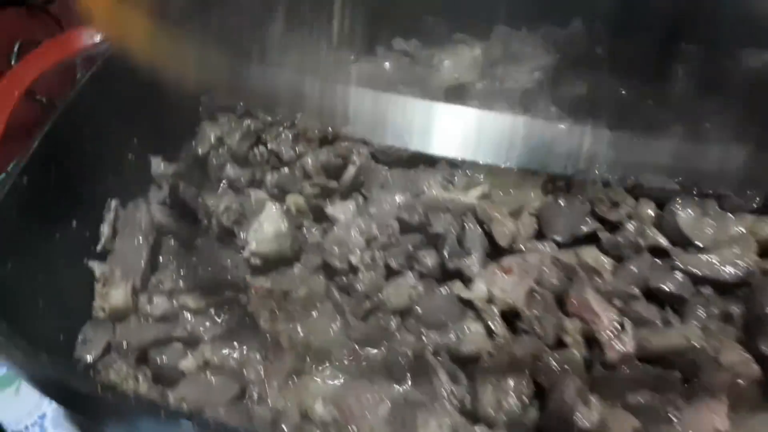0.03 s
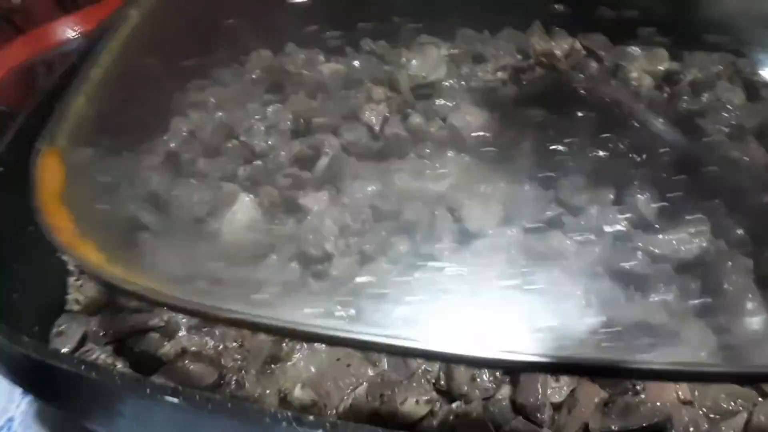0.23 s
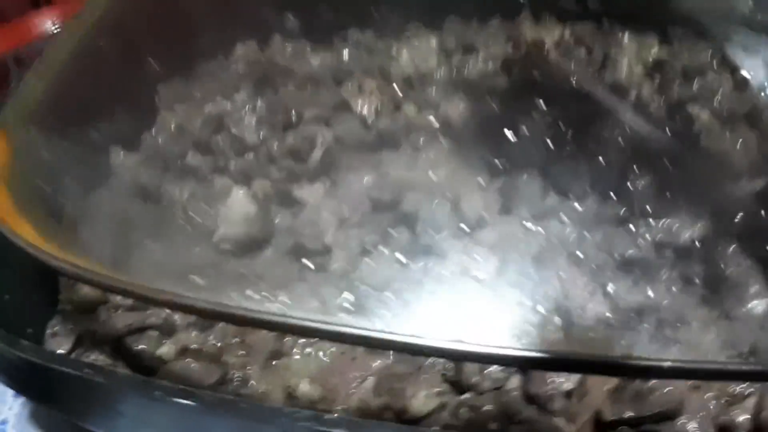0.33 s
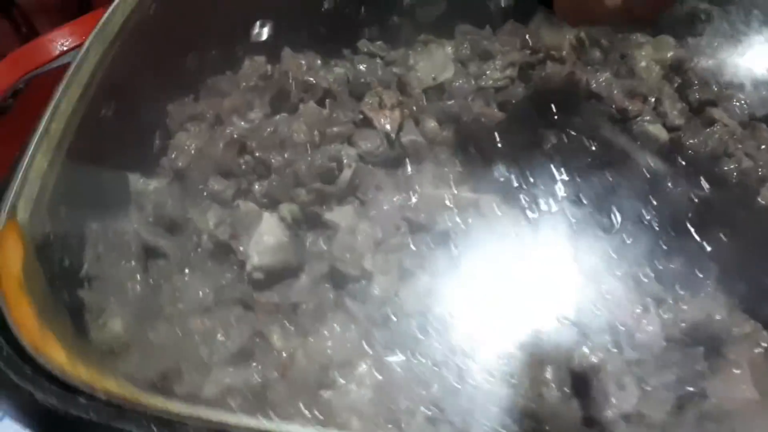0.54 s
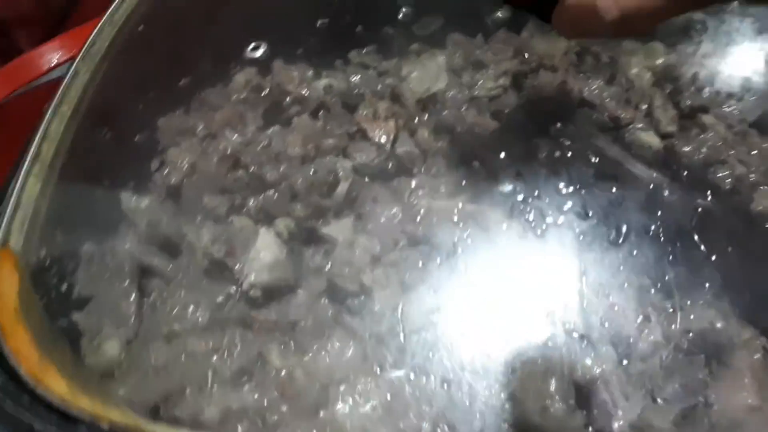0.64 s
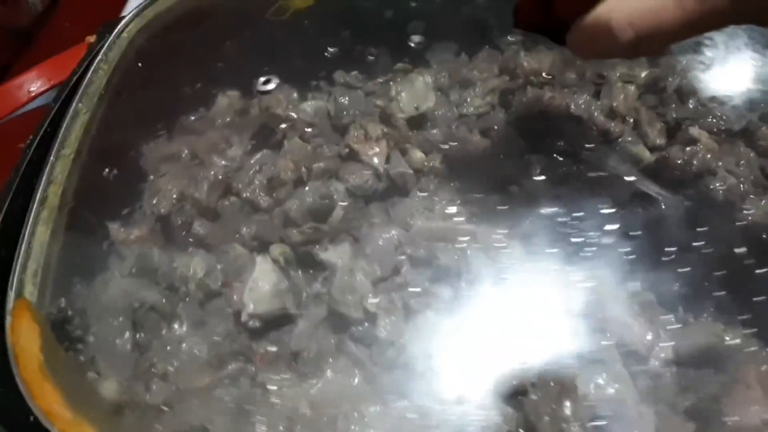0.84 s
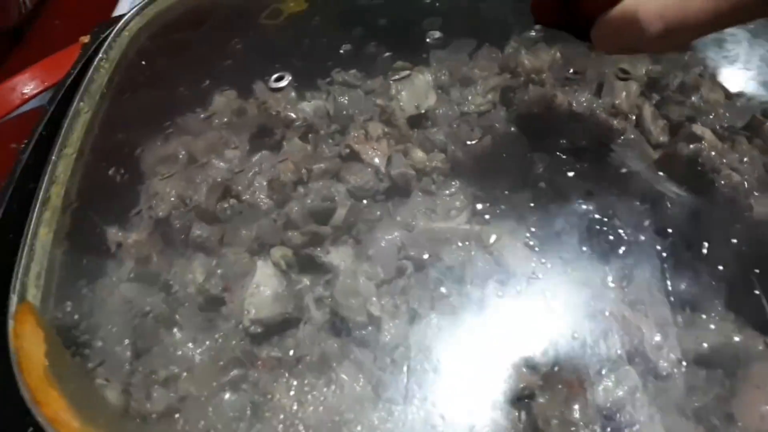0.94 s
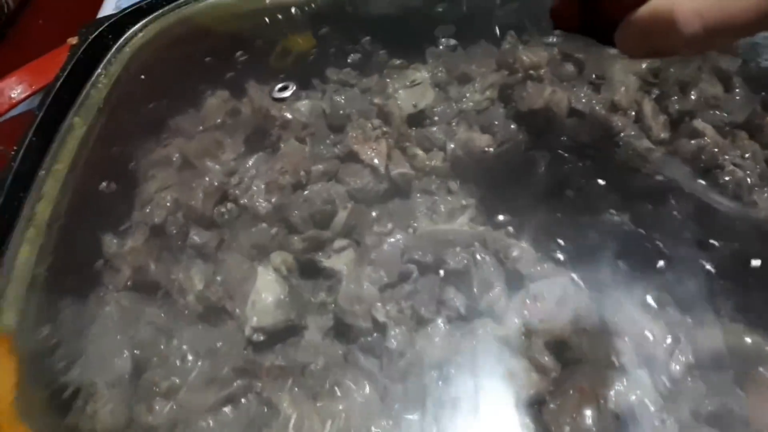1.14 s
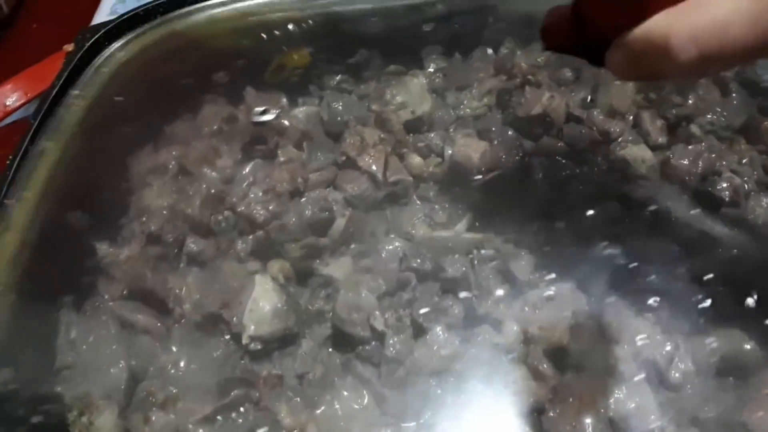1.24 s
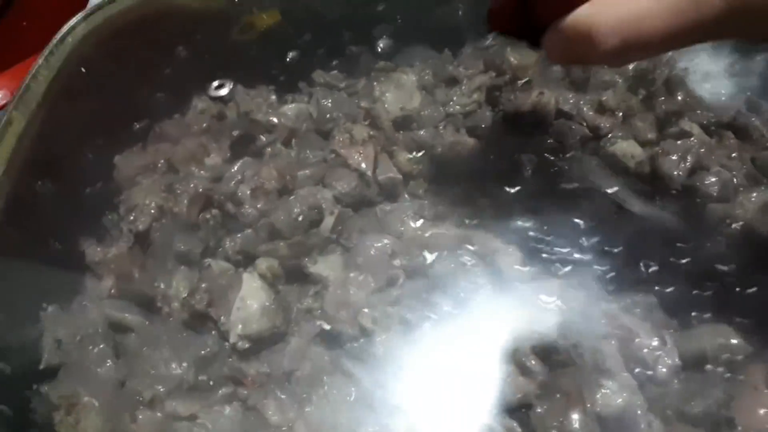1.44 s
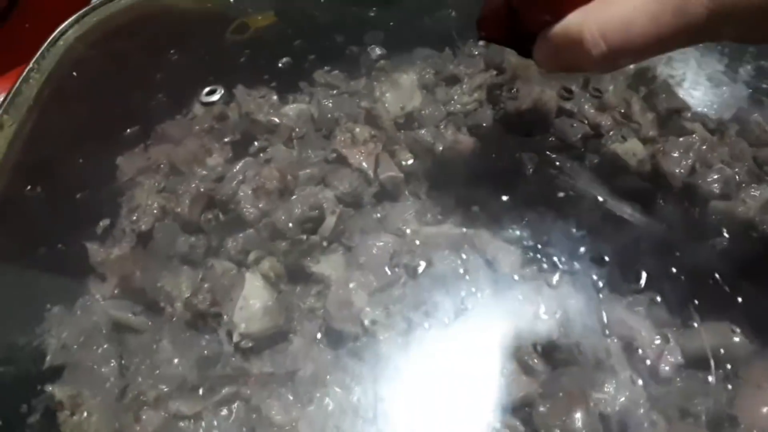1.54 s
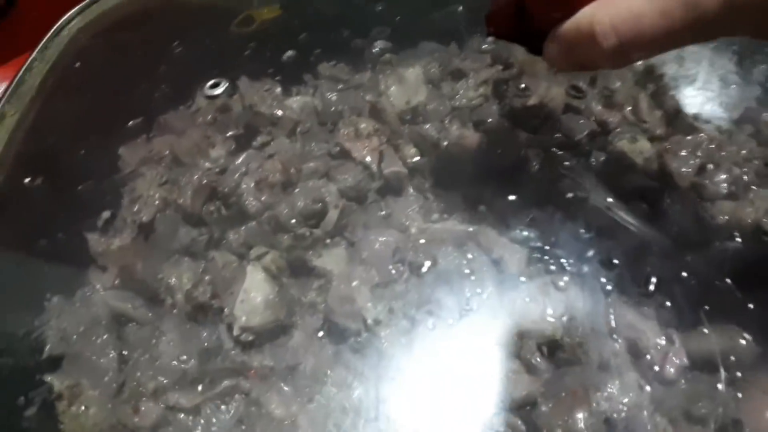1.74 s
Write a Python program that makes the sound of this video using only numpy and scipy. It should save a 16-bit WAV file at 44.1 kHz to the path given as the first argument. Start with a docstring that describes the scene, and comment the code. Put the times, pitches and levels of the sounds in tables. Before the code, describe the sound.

A glass lid clatters, scrapes and thuds onto a pan of faintly sizzling food.

```python
"""Glass lid on a frying pan

A steel-rimmed glass lid is put on a pan of frying food, close by in a small kitchen.
It lands with a clatter, is nudged and scraped along the rim, and drops into place with deepening thuds.
Every knock thumps the pan and rings the lid. The faint sizzle gets quieter as the lid closes."""
import sys
import numpy as np
from scipy import signal
from scipy.fft import rfft, irfft, next_fast_len
from scipy.io import wavfile

SR = 44100
rng = np.random.default_rng(int(sys.argv[2]) if len(sys.argv) > 2 else 0)


def file_out(sig):
    """Save sig as 16-bit WAV at sys.argv[1]."""
    # one column per channel
    cols = np.atleast_2d(sig).T
    # limit, then scale
    lim = np.clip(cols, -1, 1)
    pcm = np.round(lim * 32767).astype(np.int16)
    wavfile.write(sys.argv[1], SR, pcm)


N = 79380
TIME_S = np.arange(N) / SR

# Levels in all tables are relative. A decay is the time a sound takes to fall by 60 dB.
# Each knock of the lid on the pan:
# start_s, thump_pitch_hz, thump_db, thump_rise_s, thump_decay_s, clack_db, crack_db, tick_db
KNOCK_EVENTS = [ (0.2186, 373.5, -7, 0.00046, .035, -16.5, -22.5, -28.5),
                (.249, 411, -7.5, 0.00041, 0.043, -15.5, -28, -29.5),
                (0.2601, 383, -7, 0.00083, 0.026, -17, -26.5, -34),
                (0.2742, 346, -3.5, 0.0008, 0.018, -16, -27.5, -32.5),
                (.2915, 305, -14.5, 0.0011, 0.082, -13, -33, -38),
                (.306, 315.5, -8.5, 0.00074, 0.067, -16, -26.5, -32.5),
                (.329, 326.4, -10.5, 0.0031, 0.07, -42, -38, -58),
                (0.397, 308, -7, 0.0028, 0.057, -21.5, -32.5, -43),
                (0.4151, 298.4, -11.5, 0.00033, .045, -51, -44, -68),
                (.460, 208, -26.5, .001, 0.081, -40, -46.5, -58),
                (.474, 333, -11, 0.011, 0.057, -34, -67, -64),
                (.506, 202.5, -29.5, 0.0051, 0.11, -47, -59, -66),
                (0.559, 281, -14, 0.00062, 0.044, -26.5, -42, -51),
                (.577, 224, -9.5, 0.001, 0.062, -29, -36.5, -48.5),
                (0.5825, 232, -42, 0.0012, 0.025, -24, -42.5, -50),
                (.600, 284, -23.5, 0.0051, .07, -54, -48, -59),
                (0.618, 317, -28.5, 0.0062, 0.1, -63, -67, -75),
                (.727, 247, -12, 0.0084, 0.036, -47, -75, -76),
                (.8582, 274, -2.5, 0.0026, 0.03, -27.5, -56.5, -74),
                (0.8738, 268, -12.5, 0.0016, 0.026, -35, -49, -58),
                (.912, 253, -18, 0.0029, 0.04, -40, -54, -63),
                (.938, 296, -23, 0.0011, 0.043, -50, -61, -70),
                (1.067, 306, -21, .0015, 0.12, -37.5, -56, -58),
                (1.0793, 213, -13, 0.0016, 0.051, -28, -41, -55.5),
                (1.1083, 335, -19.5, 0.00094, 0.067, -38, -52, -66),
                (1.192, 353, -14.5, 0.00081, 0.036, -25.5, -41.5, -62),
                (1.211, 361, -24, .002, 0.066, -24, -67, -60),
                (1.2455, 342.3, -3, 0.0011, 0.061, -18.5, -32, -36.5),
                (1.2796, 319, -10, 0.0011, 0.069, -17.5, -32.5, -37),
                (1.385, 270, -0.5, 0.0021, 0.02, -26.5, -42, -54),
                (1.405, 257, -9, 0.0021, 0.044, -34, -56, -75),
                (1.456, 193, -4.5, 0.0013, 0.016, -15, -28.5, -51),
                (1.464, 221, -7.5, 0.0011, 0.051, -20, -37, -41),
                (1.481, 256, -9, 0.00048, 0.052, -28.5, -35, -45.5),
                (1.509, 197.6, -6, 0.00041, 0.017, -39, -45, -47),
                (1.520, 134.7, -11.5, 0.00067, 0.093, -50, -59, -67),
                (1.5265, 200, -12.5, 0.00088, 0.025, -26, -79, -71),
                (1.536, 243, -12, 0.00082, 0.03, -46, -67, -73)]


def amp(db):
    """Turn decibels into a gain."""
    return 10 ** (np.asarray(db) / 20)


def unit(x):
    """Scale a sound to an average (rms) level of 1."""
    return x / np.sqrt(np.mean(x ** 2) + 1e-20)


def along(points, hz):
    """Read between the rows of a (pitch_hz, value) table, on a log pitch scale."""
    pitches, values = np.transpose(points)
    return np.interp(np.log(hz + 1), np.log(pitches + 1), values)


def fade(t, decay_s):
    """Start at t = 0 and die away."""
    return (t >= 0) * np.exp(-np.log(1000) * np.maximum(t, 0) / decay_s)


def struck(t, rise_s, decay_s):
    """Rise smoothly from t = 0, then die away."""
    return fade(t, decay_s) * (1 - np.exp(-(t / rise_s) ** 2))


def filtered(x, response):
    """Multiply each frequency in x by response(hz)."""
    size = next_fast_len(N + SR // 2)
    return irfft(rfft(x, size) * response(np.fft.rfftfreq(size, 1 / SR)), size)[..., :N]


def coloured(pair, tone):
    """Turn two unrelated signals into one stereo sound with the given tone."""
    # How alike left and right are: pitch_hz, likeness (0 to 1)
    likeness = [(100, 1), (350, 0.61), (900, 0.24), (2000, 0), (16000, 0)]

    def response(hz):
        angle = np.arccos(np.clip(along(likeness, hz), -1, 1)) / 2
        return amp(along(tone, hz)) * [np.cos(angle), np.sin(angle)]
    mid, side = filtered(pair, response)
    return unit(np.array([mid + side, mid - side]))


def noise(tone):
    """Smooth stereo noise."""
    return coloured(rng.standard_normal((2, N)), tone)


def clicks(tone, per_s):
    """Tiny clicks at random moments."""
    return coloured((rng.random(N) < per_s / SR) * rng.standard_normal((2, N)), tone)


def kitchen():
    """A low, steady rush with a faint hum."""
    # Tone of the rush: pitch_hz, level_db
    rush_tone = [(20, -48), (45, -34), (62, 2.5), (95, -8), (200, 2), (310, 3), (420, 8), (520, -6.5),
                 (850, -2), (1300, -16), (3000, -39.5), (16000, -63)]
    hum_hz = 418
    return amp(-43.5) * noise(rush_tone) + amp(-50.5) * np.sin(2 * np.pi * hum_hz * TIME_S)


def room_echo(x):
    """The kitchen answers a sound with a short wash of echoes."""
    # How long the room rings: pitch_hz, decay_s
    decays = [(150, 0.37), (400, 0.4264), (1500, 0.54), (5000, 0.23), (14000, 1)]
    # How strongly it answers: pitch_hz, level_db
    echo_tone = [(100, -12), (200, -7.5), (330, -1), (550, 1.5), (1300, -12), (5000, -4), (14000, -19)]
    delay_s = 0.0069
    hz, t, bands = signal.stft(rng.standard_normal((2, SR // 2)), SR, nperseg=256)
    tail = signal.istft(bands * fade(t, along(decays, hz)[:, None]), SR, nperseg=256)[1]
    echo = signal.fftconvolve(x, tail / np.linalg.norm(tail[0]), axes=1)[:, :N]
    return filtered(echo, lambda f: amp(along(echo_tone, f)) * np.exp(-2j * np.pi * f * delay_s))


def sizzle():
    """Hot fat hisses, pops and throws a fine spray, quieter under the lid."""
    # Loudness of the frying and of the spray: time_s, level_db
    frying_levels = [(0, -46), (.3, -44.5), (.7, -49.5), (.95, -47), (1.4, -43.5), (1.8, -54.5)]
    spray_levels = [(0, -49.5), (.5, -58), (.78, -64), (.95, -58), (1.1, -61), (1.35, -60), (1.8, -62)]
    # Their tones: pitch_hz, level_db
    frying_tone = [(200, 8), (800, 7), (1400, 8.5), (2500, 1), (4500, -3), (5600, -11.5), (8300, -14.5),
                   (10000, -24.5), (13000, -12), (16000, -37)]
    spray_tone = [(3000, -11), (6500, 2), (8200, 7), (10000, 0.5), (13000, 0), (16000, 8)]
    loudness = lambda levels: amp(np.interp(TIME_S, *np.transpose(levels)))
    frying = noise(frying_tone) + amp(-10.5) * clicks(frying_tone, per_s=350)
    return loudness(frying_levels) * frying + loudness(spray_levels) * noise(spray_tone)


def pings():
    """Glass and spitting fat give brief, high pings."""
    # Each ping: start_s, pitch_hz, level_db, decay_s
    events = [(0.2203, 5960, -29, 0.011), (0.561, 4470, -48, 0.057), (0.65, 8100, -56, 0.035),
              (1.195, 4840, -39, 0.025), (1.211, 4760, -41, 0.043)]
    width = 0.064  # as a share of the pitch

    def ring(hz):
        hiss = rng.standard_normal((2, N))
        return unit(filtered(hiss, lambda f: 1 / (1 + ((f / hz - 1) / width) ** 4)))
    return sum(amp(db) * fade(TIME_S - start, decay) * ring(hz) for start, hz, db, decay in events)


def rim_scrapes():
    """The rim slides over the pan's edge in many small slips."""
    # Each slide: start_s, rise_s, fall_s, level_db
    slides = [(0.249, 0.041, 0.063, -25), (1.088, 0.057, 0.038, -28.5), (1.256, 0.019, 0.049, -25.5),
              (1.46, 0.018, 0.15, -35)]
    # Tone of the scraping: pitch_hz, level_db
    scrape_tone = [(60, -20), (160, 11), (330, 9), (650, -7.5), (850, 1), (1020, -1.5), (1350, 2),
                   (1580, -4.5), (1800, -1.5), (2200, -9), (4400, -15.5), (5600, -25.5), (8300, -28),
                   (10000, -36), (16000, -35)]
    push = sum(amp(db) * np.interp(TIME_S, [start, start + rise, start + rise + fall], [0, 1, 0])
               for start, rise, fall, db in slides)
    return push * clicks(scrape_tone, per_s=4500)


def rim_clatter():
    """Each knock shakes rim and pan: a clack, a sharp crack, a high tick, then the rim buzzes on."""
    # Tones of the quickly damped shaking, its hard edge and its highest part: pitch_hz, level_db
    clack_tone = [(30, -45), (90, -17.5), (180, 1), (450, 7), (650, -2), (830, -5), (1020, -5),
                  (1320, -3.5), (1650, -9), (2100, -12.5), (2800, -17.5), (4500, -31), (16000, -70)]
    crack_tone = [(300, -39), (1400, 1), (2000, -1), (2400, -2), (2750, 2), (3600, 1), (4600, -2),
                  (5400, -9.5), (8000, -28), (16000, -34)]
    tick_tone = [(2000, -33), (5000, -14), (6200, 1), (8300, 2.5), (9800, -5.5), (12300, -3),
                 (16000, -13.5)]
    starts, *_, clack_db, crack_db, tick_db = np.transpose(KNOCK_EVENTS)

    def strikes(levels_db, rise_s, decay_s):
        power = np.zeros(N)
        for start, db in zip(starts, levels_db):
            age = TIME_S - start
            snap = 1 + amp(-1) * fade(age, decay_s=0.014)  # the first instant stands out
            power += (amp(db) * struck(age, rise_s, decay_s) * snap) ** 2
        return np.sqrt(power)
    clack = strikes(clack_db - 4.5, rise_s=0.00046, decay_s=0.081) * noise(clack_tone)
    crack = strikes(crack_db - 3.5, rise_s=0.00026, decay_s=0.082) * noise(crack_tone)
    tick = strikes(tick_db - 4, rise_s=0.0001, decay_s=0.049) * noise(tick_tone)
    buzz = strikes(tick_db - 12, rise_s=0.0001, decay_s=0.17) * clicks(tick_tone, per_s=1800)
    return clack + crack + tick + buzz


def lid_ring():
    """Each knock rings the lid's own notes in a slightly new mix; soft knocks sound duller."""
    # The lid's notes: pitch_hz, level_db, decay_s
    notes = [(651, -9, 0.1), (807, 4, 0.066), (858, -0.5, 0.086), (984, -12.5, 0.083), (1157, -9, 0.1),
             (1243, 0.5, 0.12), (1298.5, -5, 0.12), (1348, 10, 0.042), (1376, -4.5, 0.074),
             (1586, -8.5, 0.15), (1786, 2, 0.055), (1841, -7.5, 0.17), (1963, -12, 0.28),
             (2249, -14.5, 0.38), (2707, -2, 0.067), (3066, -23, 0.14)]
    rise_s, dull_above_hz = 0.00026, 1197
    out = np.zeros((2, N + SR))
    t = np.arange(SR // 3) / SR
    rings = [amp(db) * struck(t, rise_s, decay) * np.sin(2 * np.pi * hz * t) for hz, db, decay in notes]
    octaves_up = np.maximum(np.log2(np.array(notes)[:, 0] / dull_above_hz), 0)
    for start, *_, clack_db, crack_db, _ in KNOCK_EVENTS:
        softness_db = max(clack_db - crack_db - 12.5, 0)  # a weak crack means a soft knock
        scatter_db = 0.5 * rng.standard_normal((2, len(notes)))
        gains = amp(clack_db - 11.5 - 2 * softness_db * octaves_up + scatter_db)
        signs = rng.choice([-1, 1], gains.shape)
        first = round(start * SR)
        out[:, first:first + len(t)] += (gains * signs) @ rings
    return out[:, :N]


def pan_thumps():
    """Each knock gives a short, hollow thump that sets the pan ringing."""
    # Notes of the pan and the air under the lid: pitch_hz, width_hz, level_db
    notes = [(141, 21, -14), (264, 12, -30), (334.3, 14, -9), (378, 8.5, -34), (444.7, 17, -2.5),
             (572.6, 8, 8.5)]
    low_cut_hz, head_start_cycles = 105, 0.06
    thumps = np.zeros(N)
    for start, hz, db, rise, decay, *_ in KNOCK_EVENTS:
        age = np.maximum(TIME_S - start, 0)
        loudness = amp(db) * fade(age, decay) * (1 - np.exp(-age / rise))
        thumps += loudness * np.sin(2 * np.pi * (hz * age + head_start_cycles))
    thumps = signal.sosfilt(signal.butter(2, low_cut_hz, 'high', fs=SR, output='sos'), thumps)
    ringing = lambda f: sum(amp(db) * 1j * f * width / (hz * hz - f * f + 1j * f * width)
                            for hz, width, db in notes)
    return thumps + filtered(thumps, ringing)


def scene():
    """The pan stands to the right, with the kitchen's sound and echo around it."""
    # The left microphone faces away, so it hears less than the right: pitch_hz, level_db
    left_tone = [(60, -3), (250, -6), (600, -5.5), (1200, -7), (2200, -6), (4000, -12), (8000, -9),
                 (14000, -10)]
    left_lag_s = 0.00014
    lid = pan_thumps() + lid_ring() + rim_clatter() + rim_scrapes() + pings()
    left = filtered(lid[0], lambda hz: amp(along(left_tone, hz)) * np.exp(-2j * np.pi * hz * left_lag_s))
    direct = amp(5) * np.array([left, lid[1]])
    echo = amp([[-5], [0]]) * room_echo(lid)
    background = amp([[-7], [0]]) * (sizzle() + kitchen())
    return direct + echo + background


def record(dry):
    """Round off the loudest peaks and cut the very highest treble."""
    ceiling, top_hz = 0.97, 16000
    rounded = dry / (1 + (dry / ceiling) ** 6) ** (1 / 6)
    return filtered(rounded, lambda hz: hz < top_hz)


dry = scene()
out = record(dry)
file_out(out)
```